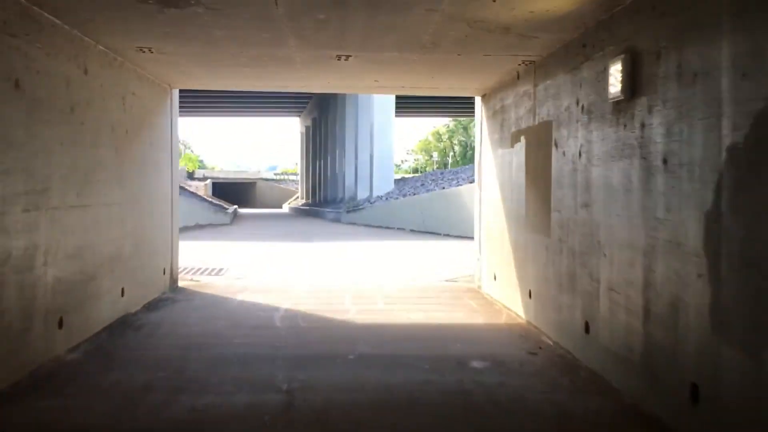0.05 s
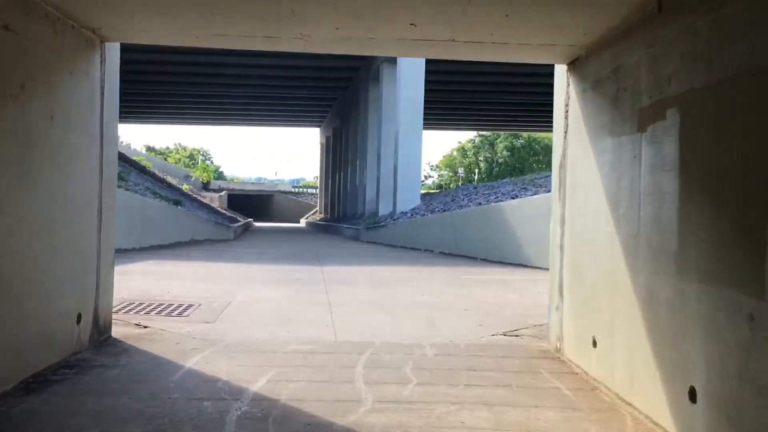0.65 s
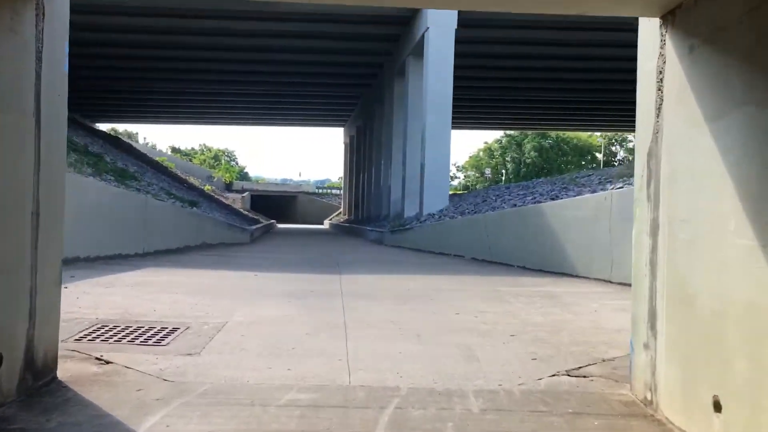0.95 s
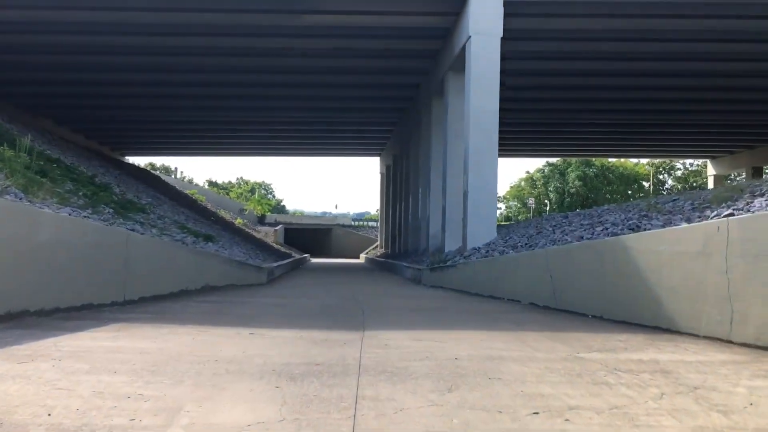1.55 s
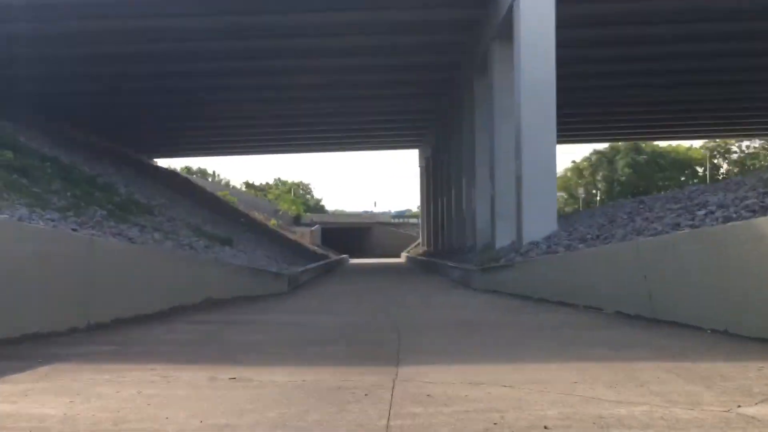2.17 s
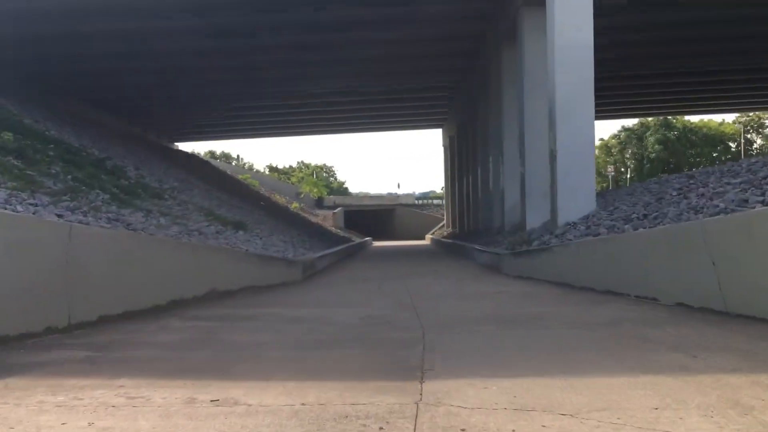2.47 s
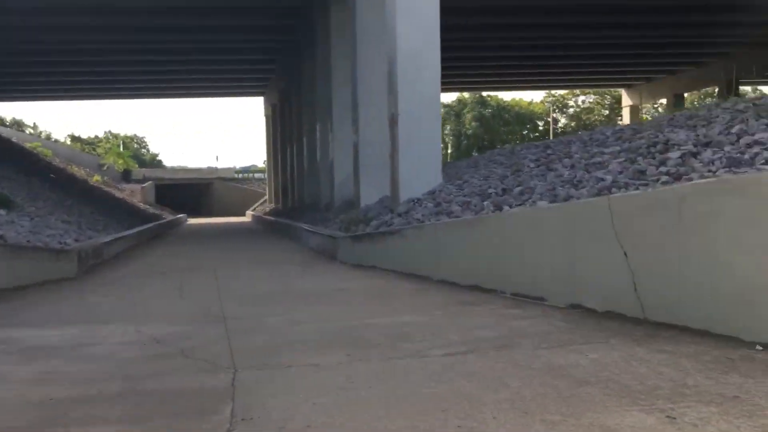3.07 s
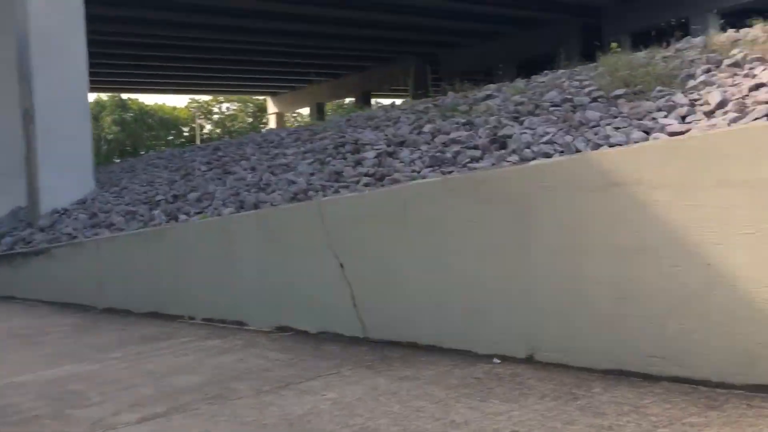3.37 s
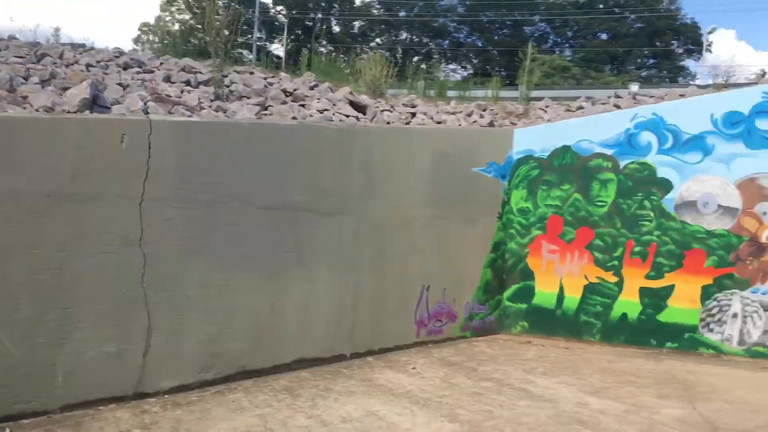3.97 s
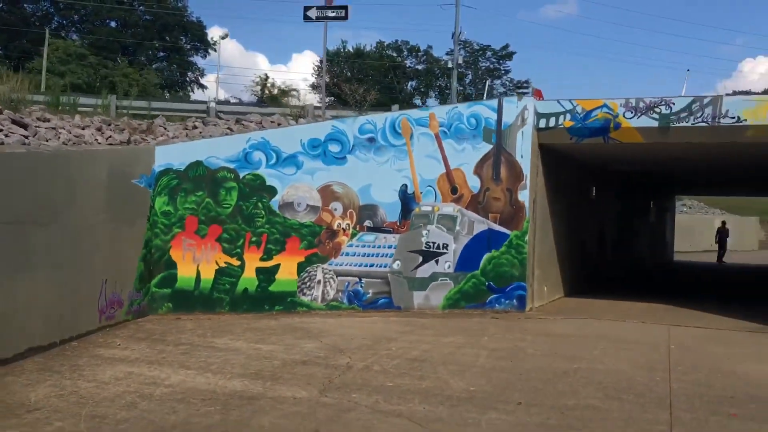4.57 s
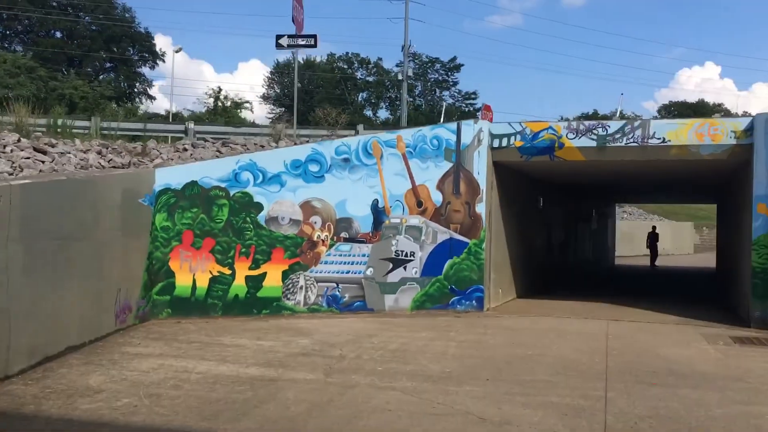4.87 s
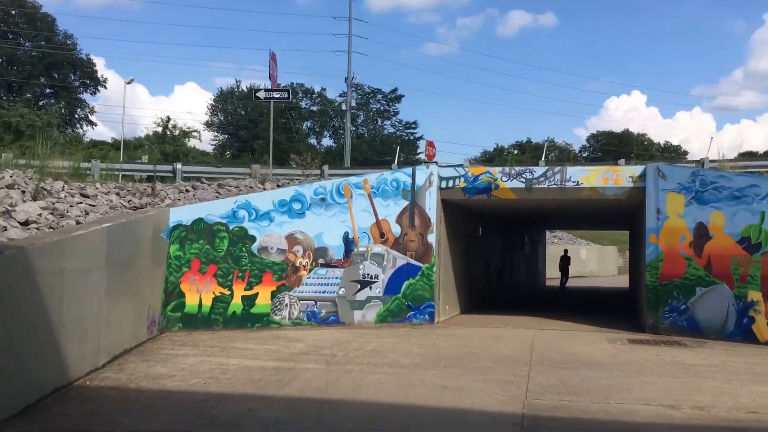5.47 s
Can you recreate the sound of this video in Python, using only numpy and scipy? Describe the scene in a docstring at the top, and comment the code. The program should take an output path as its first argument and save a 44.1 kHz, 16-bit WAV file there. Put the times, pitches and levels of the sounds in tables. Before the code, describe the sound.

Close skateboard wheels roar over rough pavement, with a wavering hollow drone and fluttering echo from a concrete tunnel. The board moves under a road bridge and into the open, its rumble rising and falling with the surface, dotted with clacks, thuds and sandy hiss. Later, wind bumps against the travelling microphone and the rolling softens, with an even hum of road traffic behind it.

```python
"""In a concrete tunnel, a skateboard carries the microphone out, under a road bridge and round a bend.
Rough pavement drums through the wheels into the deck (the wooden board). Grit crackles, the wheel
bearings sizzle, and joints in the path knock the trucks (the steel axles). In the tunnel the roar
flutters between floor and ceiling; outside there is wind and a wash of highway traffic."""
import sys
import numpy as np
from scipy import signal
from scipy.fft import rfft, irfft, next_fast_len
from scipy.io import wavfile
from scipy.ndimage import map_coordinates

SR = 44100
rng = np.random.default_rng(int(sys.argv[2]) if len(sys.argv) > 2 else 0)


def transcribe(signal):
    """Save signal, clipped to [-1, 1], as a 16-bit WAV file at the path in sys.argv[1]."""
    frames = np.atleast_2d(signal).T
    limited = np.clip(frames, -1, 1)
    pcm = np.round(limited * 32767).astype(np.int16)
    wavfile.write(sys.argv[1], SR, pcm)


N = 248267
TIME = np.arange(N) / SR
BEND_START_S, BEND_END_S = 2.98, 3.92

# How hard the pavement shakes the board. Each row: time in seconds, level in dB.
ROUGHNESS = [(0, -14), (.15, -17.5), (.27, -21.5), (.5, -17.5), (.8, -18.5), (1.09, -18.5), (1.28, -14),
             (1.54, -16), (1.72, -13), (1.9, -17), (2.17, -23), (2.6, -19), (2.9, -18), (3.1, -14.5),
             (3.3, -18), (3.68, -16.5), (3.79, -22.5), (3.95, -20), (4.12, -25), (5.63, -24)]
# Smooth and sandy stretches of the path. Each row: time in seconds, grit level in dB.
SANDINESS = [(0, -46), (.05, -45.5), (.09, -48.5), (.13, -43), (.17, -53), (.205, -43), (.26, -51),
             (.43, -52.5), (.5, -47.5), (.57, -52), (.85, -49), (1.0, -51.5), (1.1, -53), (1.25, -43),
             (1.6, -44), (1.81, -42), (2.0, -53), (2.13, -57.5), (2.39, -57), (2.54, -52.5), (2.92, -52),
             (3.1, -47), (3.32, -50.5), (3.56, -44.5), (3.7, -45), (3.77, -48.5), (3.88, -46), (4.2, -53),
             (5.63, -50.5)]
# The bright tone of grit. Each row: frequency in Hz, level in dB.
GRIT_TONE = [(1500, -8.5), (3200, 4), (4100, -1), (4700, -0.5), (5300, 1), (6700, 0.5), (7600, -3.5),
             (9700, -2.5), (10450, -11), (11200, -8), (13000, -11.5), (15700, -15)]


def amp(db):
    """Turn decibels into a number to multiply by."""
    return 10 ** (np.asarray(db) / 20)


def unit(x):
    """Scale a sound so that its average strength (rms) is 1."""
    return x / np.sqrt(np.mean(x ** 2) + 1e-20)


def curve(rows):
    """Join (time, value) rows with straight lines, giving one value per sample."""
    return np.interp(TIME, *np.transpose(rows))


def wobble(rate):
    """A smooth random curve through `rate` new values a second."""
    return map_coordinates(rng.standard_normal(int(N * rate / SR) + 4), [TIME * rate])


def filtered(x, response):
    """Scale and delay each frequency in x as response(hz) says."""
    size = 2 * next_fast_len((N + SR // 2) // 2)
    return irfft(rfft(x, size) * response(np.fft.rfftfreq(size, 1 / SR)), size)[:N]


def shaped(x, tone):
    """Give x the tone drawn by (Hz, dB) rows."""
    def response(hz):
        row_hz, db = np.transpose(tone)
        cepstrum = irfft(np.log(amp(np.interp(np.log(hz + 1), np.log(row_hz), db))))
        # Folding this in half makes the ringing come after each push, never before it.
        half = len(cepstrum) // 2
        cepstrum[1:half] *= 2
        cepstrum[half + 1:] = 0
        return np.exp(rfft(cepstrum))
    return filtered(x, response)


def add(track, start_s, sound):
    """Mix a short sound into the track."""
    part = track[max(0, round(start_s * SR)):][:len(sound)]
    part += sound[:len(part)]


def after(s, shift_s=0.27):
    """Go from 0 to 1 around time s, as fast as the rider shifts weight."""
    return np.clip(0.5 + (TIME - s) / shift_s, 0, 1)


def ride(usual_rough_db=-16.5, usual_grit_db=-52.5):
    """Roughness and grit in dB above ordinary rolling, and the lean into the bend (0 to 1)."""
    lean = after(BEND_START_S) - after(BEND_END_S)
    return curve(ROUGHNESS) - usual_rough_db, curve(SANDINESS) - usual_grit_db, lean


def pavement(rate, spread_db, stony):
    """Force on the wheels: fine texture plus `rate` uneven stones a second; stony is their share."""
    sizes = amp(spread_db * np.minimum(rng.standard_normal(N), 2))
    stones = (rng.random(N) < rate / SR) * rng.choice([-1, 1], N) * sizes
    return np.sqrt(stony) * unit(stones) + np.sqrt(1 - stony) * rng.standard_normal(N)


def ring(notes, t):
    """A struck part rings with several fading notes, a little different on every blow."""
    out = np.zeros(len(t))
    for k, (hz, db, fade_s) in enumerate(notes):
        fade = amp(db + rng.normal(0, 0.41) - 60 * t / fade_s)
        wave = np.sin(2 * np.pi * hz * rng.normal(1, 0.034) * t)
        out += (-1) ** k * fade * wave  # neighbouring notes swing opposite ways
    return out


def traffic(gain_db=-1):
    """Tyres and engines on the highway merge into a soft, even wash."""
    # It fades under the bridge and swells in the open. Each row: time in seconds, level in dB.
    loudness = [(0, -23), (2.4, -59), (3.6, -61), (4.2, -27.5), (4.7, -26), (5.63, -25.5)]
    # The tone of the wash. Each row: frequency in Hz, level in dB.
    tone = [(60, -16), (205, 5), (380, -7), (900, 3.5), (1300, -15.5), (1700, -11.5), (2700, -39),
            (3300, -26), (4600, -34.5), (6000, -37.5), (9500, -41), (12000, -50), (15000, -73)]
    return amp(curve(loudness) + gain_db) * unit(shaped(rng.standard_normal(N), tone))


def wind(gain_db=-1, gust_width=1.4):
    """Swirls of air beat on the microphone. Gusts thump over the breeze, lower for bigger swirls."""
    # The steady flow of air. Each row: time in seconds, level in dB.
    breeze = [(0, -37), (2.2, -34.5), (2.9, -32), (4.3, -33.5), (4.8, -41.5), (5.63, -36.5)]
    # Its low rumble. Each row: frequency in Hz, level in dB.
    tone = [(15, -69), (30, -15), (47, 0.5), (70, -2), (105, -6.5), (135, -3), (200, -3), (350, -15),
            (900, -64), (3000, -100)]
    # Each row: time of a gust's peak in seconds, level in dB, half length in seconds, pitch in Hz.
    gusts = [(1.5, -29.5, 0.043, 150), (2.037, -33.5, 0.044, 66), (2.612, -24.5, 0.017, 65),
             (2.885, -30.5, .03, 60), (3.605, -27, 0.025, 155), (3.7, -21.5, 0.025, 161),
             (3.977, -15.5, 0.027, 200), (4.026, -18.5, 0.027, 270), (4.027, -19.5, 0.027, 85),
             (4.366, -28.5, 0.053, 142), (4.49, -27, 0.045, 114), (5.44, -29, 0.023, 130)]
    lumpy_air = rng.standard_normal(N) * amp(3 * wobble(22.14))
    out = amp(curve(breeze) + gain_db) * unit(shaped(lumpy_air, tone))
    for peak_s, db, half_s, hz in gusts:
        band = signal.butter(2, [hz / gust_width, hz * gust_width], "bandpass", fs=SR, output="sos")
        swell = np.exp(-((TIME - peak_s) / half_s) ** 2 / 2)
        thump = unit(swell * signal.sosfilt(band, rng.standard_normal(N)))
        out += amp(db) * np.sqrt(np.mean(swell ** 2)) * thump
    return out


def tunnel_drone(gain_db=-1, waver_db=3.5, pitch_drift=0.005):
    """Air between the walls rings in hollow, wavering notes that swell and fade along the tunnel."""
    # Each row: a note's pitch in Hz, level in dB, loudest moment in seconds, half length in seconds.
    notes = [(128, -37.5, 0.4, 0.89), (148.8, -41, 0.4, .6), (207.5, -28.5, 0.64, 0.82),
             (253.3, -28, 0.52, 0.44), (266.3, -24, 0.45, 0.5), (395.7, -24, 0.41, 0.23),
             (525, -30, 0.35, 0.6), (633, -23.5, 0.39, 0.5), (632.4, -16.5, 0.917, 0.16),
             (391, -33, 1.58, 0.2)]
    out = np.zeros(N)
    for hz, db, peak_s, half_s in notes:
        phase = 2 * np.pi * np.cumsum(hz * (1 + pitch_drift * wobble(18))) / SR
        waver = unit(amp(waver_db * np.tanh(wobble(20.76))))
        swell = np.exp(-((TIME - peak_s) / half_s) ** 2)
        out += amp(db + gain_db) * waver * swell * unit(np.sin(phase))
    return out


def tunnel_echo(x, first_echo_s=0.019, flutter_hz=128.3, bounce=0.75, dull_above_hz=1800):
    """Sound bounces between floor and ceiling, duller each time."""
    # How closed in the path is. Each row: time in seconds, share of echo from 0 to 1.
    enclosure = [(0, 0.46), (.9, 0.13), (1.2, 0.27), (1.8, 0.3), (2.1, 0)]

    def flutter(hz):
        first_echo = np.exp(-2j * np.pi * hz * first_echo_s)
        round_trip = np.exp(-2j * np.pi * hz / flutter_hz)
        kept = bounce / (1 + (hz / dull_above_hz) ** 4)
        return first_echo / (1 - kept * round_trip)
    share = curve(enclosure)
    echo = np.std(x) * unit(filtered(x, flutter))
    return np.sqrt(1 - share) * x + np.sqrt(share) * echo


def bearings(load, patches_db, sag_hz=200):
    """Steel balls rattle in the wheels: louder on rough ground and in the bend, softer after it."""
    # Their high, narrow ring. Each row: frequency in Hz, level in dB.
    tone = [(6000, -34), (8000, -18), (8700, 3), (9450, 13), (9950, -2), (10450, -20), (14000, -43)]
    rough_db, grit_db, lean = ride()
    level_db = -61 + 0.94 * rough_db + 0.4 * grit_db + 0.73 * patches_db
    level_db += 4 * lean - 11 * after(BEND_END_S)
    rattle_db = 6 * np.tanh(wobble(190))
    sizzle = shaped(rng.standard_normal(N) * amp(load + rattle_db), tone)
    # The sideways load in the bend slides the pitch down.
    sag = np.exp(-2j * np.pi * np.cumsum(sag_hz * lean) / SR)
    ringing = np.real(signal.hilbert(sizzle, next_fast_len(N))[:N] * sag)
    return amp(level_db) * unit(ringing)


def sand(load, patches_db, tick_fade_s=0.009):
    """Grains hiss under the wheels, bigger ones tick, and on the sandiest stretches they crunch."""
    # The tone of splitting grains. Each row: frequency in Hz, level in dB.
    crunch_tone = [(3000, -2), (5500, -10), (9500, -2), (10450, -22), (11500, -7), (15700, -6)]
    grit_db = curve(SANDINESS) + patches_db
    fine_grains = pavement(rate=1200, spread_db=2.5, stony=0.11)
    hiss = unit(shaped(fine_grains * amp(0.68 * load), GRIT_TONE))
    t = np.arange(SR // 100) / SR
    big_grains = np.abs(pavement(rate=130, spread_db=3, stony=1))
    crushing = signal.fftconvolve(big_grains, amp(-60 * t / tick_fade_s))[:N]
    ticks = unit(shaped(crushing * rng.standard_normal(N), GRIT_TONE))
    splits = pavement(rate=1400, spread_db=-1, stony=0.42)
    crunch = unit(shaped(splits * amp(1.2 * load), crunch_tone))
    crunch_db = -50 + 2.4 * (grit_db - grit_db.max())
    return amp(grit_db) * (hiss + amp(-5) * ticks) + amp(crunch_db) * crunch


def bumps(gain_db=-2, fade_s=0.011, rise_share=0.21):
    """A wheel skipping over a bump makes the deck boom on one note for a moment."""
    # Each row: start in seconds, level in dB, length in seconds, pitch in Hz.
    booms = [(0.092, -10, 0.027, 393), (0.721, -15, 0.043, 630), (1.314, -8, 0.013, 654),
             (1.668, -10, 0.0029, 694), (1.696, -2, 0.0093, 633), (1.773, -1, 0.014, 657),
             (1.79, -2.5, 0.02, 661), (3.123, -15, 0.0072, 610), (3.668, -3.5, 0.0066, 667),
             (4.275, -17.5, 0.021, 195)]
    t = np.arange(SR // 6) / SR
    out = np.zeros(N)
    for start_s, db, length_s, hz in booms:
        rise = np.clip(t / (rise_share * length_s), 0, 1)
        fade = amp(-60 * np.maximum(t - length_s, 0) / fade_s)
        drift = np.cumsum(rng.normal(0, 0.019, len(t)))
        add(out, start_s, amp(db + gain_db) * rise * fade * np.sin(2 * np.pi * hz * t + drift))
    return out


def joints(gain_db=-1, crack_fade_s=0.018, crush_s=0.0011, click_fade_s=0.05):
    """Each joint or stone thuds in the deck, clacks the truck, cracks on the wheel and crushes grit."""
    # Each row: start in seconds, levels of the clack, thud and click in dB,
    # extra brightness of the clack in dB per octave, treble limit of the blow in Hz.
    blows = [(0.031, -22, -27, -30.5, -2, 3480), (0.11, -18, -7, -36, 2, 2400),
             (0.191, -12, -9, -31, 2, 2150), (0.203, -17, -31, -32, 3, 2100),
             (.479, -18, -6, -38, -2, 2000), (1.174, -19, -6, -33, 4, 2600),
             (1.201, -19, -28, -44, -6, 2480), (1.423, -22, -13, -45, 0, 2400),
             (1.598, -18, -20, -42, 5, 2500), (2.0235, -27, -20, -27.5, -4, 2900),
             (2.0256, -10, -25, -38, -1.5, 2920), (2.1055, -9, -6, -33.5, 2.5, 2270),
             (2.314, -30, -14, -54, -13, 2000), (2.33, -23, -23, -40, 1.5, 2600),
             (2.651, -35, -17, -53, -6, 2000), (2.794, -17, -14, -42, -1, 2400),
             (3.058, -20, -12, -33, 1, 2000), (3.356, -22, -8.5, -40, -5, 2000),
             (3.379, -30, -6, -34, 0, 2000), (3.483, -21, -7, -31, -5, 2400),
             (3.601, -17, -14, -33, -7, 2110), (3.626, -11, -10, -32, -12, 1800),
             (3.666, -22, -22, -29, -3, 2000), (3.687, -16, -5, -24, -11, 2400),
             (3.835, -19.5, -15, -34, 3.5, 3000), (3.881, -22, -8, -35, 3, 2100),
             (3.906, -22, -6.5, -30, 0, 1800), (4.148, -26, -13, -37, 13, 1700),
             (4.236, -22, -11, -39, 2, 1810), (4.265, -19, -23, -37, 8, 1850),
             (4.285, -22.5, -8, -39, 10, 1917), (4.375, -30, -14, -53, 4, 1520),
             (4.402, -24, -18, -49, 2, 2000), (4.605, -21, -27, -32.5, 8, 2000),
             (4.68, -21.5, -30, -40, 11, 2100), (4.695, -27, -19, -39, 9, 2200)]
    # How the deck rings. Each row: pitch in Hz, level in dB, seconds to fade by 60 dB.
    deck_notes = [(213, -20, 0.024), (332, -10.5, 0.035), (636, 2.5, 0.028), (816, -11.5, 0.031)]
    # How the steel trucks ring, with the same columns.
    truck_notes = [(973, 10, 0.017), (1160, 2.5, 0.017), (1350, -8.5, 0.028), (1690, -7.5, 0.025),
                   (1990, -11, 0.027), (2375, -15.5, 0.069), (3120, -23, 0.034)]
    lowest_hz = truck_notes[0][0]
    t = np.arange(SR // 8) / SR
    knocks, clicks = np.zeros((2, N))
    for start_s, clack_db, thud_db, click_db, tilt_db, limit_hz in blows:
        tilted = [(hz, db + tilt_db * np.log2(hz / lowest_hz), fade_s) for hz, db, fade_s in truck_notes]
        thud = amp(thud_db) * ring(deck_notes, t)
        clack = amp(clack_db + gain_db) * ring(tilted, t)
        crack = amp(clack_db - 7 - 60 * t / crack_fade_s) * rng.standard_normal(len(t))
        # The rubbery wheel muffles blunt blows more than sharp ones.
        cushion = signal.butter(6, limit_hz, fs=SR, output="sos")
        add(knocks, start_s, signal.sosfilt(cushion, thud + clack + crack))
        rise = np.minimum(t / crush_s, 1)  # grit takes a moment to give way
        fade = amp(click_db + gain_db - 60 * t / click_fade_s)
        add(clicks, start_s, rise * fade * rng.standard_normal(len(t)))
    return knocks + shaped(clicks, GRIT_TONE)


def rolling(load):
    """The pavement shakes the board: wheels hum, the deck flexes and roars, and the trucks chatter."""
    # The tones of these four sounds. Each row: frequency in Hz, level in dB.
    hum_tone = [(20, -63), (70, -55), (120, -11), (165, -6), (205, 3), (245, -2.5), (300, -9.5), (500, -59),
                (2000, -100)]
    flex_tone = [(60, -55.5), (170, -27), (240, -16), (280, -1.5), (385, -1), (450, -5.5), (560, -23),
                 (1000, -63.5), (3000, -100)]
    roar_tone = [(100, -51.5), (330, -36.5), (450, -9), (520, -1.5), (580, 3), (660, 3), (730, -4.5),
                 (820, -7), (1010, -6.5), (1100, -15.5), (1300, -27.5), (1700, -34.5), (3000, -50),
                 (6000, -100)]
    chatter_tone = [(600, -45), (1000, -0.5), (1300, 4.5), (1650, 0.5), (2050, -6), (2400, -6.5),
                    (2800, -18.5), (3500, -26.5), (5000, -31.5), (9000, -84.5)]
    rough_db, grit_db, lean = ride()
    humps = pavement(rate=500, spread_db=4, stony=0.26)
    # Leaning presses on the wheels and deck, and steadies the trucks.
    hum_db = -29.5 + 0.45 * rough_db + 5 * lean + 2.7 * wobble(5.57)
    flex_db = -22 + 0.84 * rough_db + lean - 5 * after(BEND_END_S)
    roar_db = curve(ROUGHNESS) - 1
    chatter_db = -33.5 + 0.65 * rough_db + 0.59 * grit_db - 2 * lean
    hum = amp(hum_db) * unit(shaped(rng.standard_normal(N), hum_tone))
    flex = amp(flex_db) * unit(shaped(humps * amp(0.69 * load), flex_tone))
    stones = pavement(rate=800, spread_db=3, stony=0.38)
    roar = amp(roar_db) * unit(shaped(stones * amp(0.65 * load), roar_tone))
    chatter = amp(chatter_db) * unit(shaped(stones * amp(2.05 * load), chatter_tone))
    return hum + flex + roar + chatter


def scene():
    """Board, tunnel, traffic and wind meet at one microphone."""
    load = wobble(110)  # the weight on the wheels jitters, shaking several sounds together
    rumble = rolling(load)
    patches_db = 0.5 * wobble(27)  # sand lies unevenly
    board = tunnel_echo(rumble) + sand(load, patches_db) + bearings(load, patches_db)
    return (board + tunnel_drone() + joints() + bumps() + traffic() + wind())[None]


def record(dry, ceiling=1.1, top_hz=15780):
    """Round off the loudest peaks and cut the very highest treble."""
    rounded = dry[0] / (1 + np.abs(dry[0] / ceiling) ** 8) ** (1 / 8)
    return filtered(rounded, lambda hz: hz < top_hz)[None]


dry = scene()
out = record(dry)
transcribe(out)
```